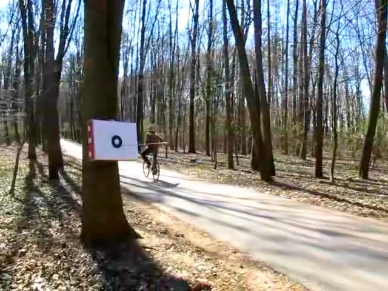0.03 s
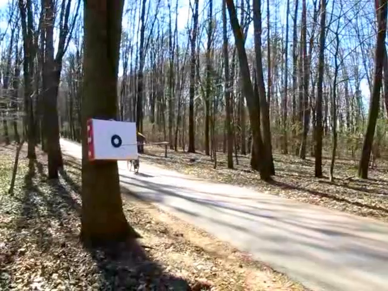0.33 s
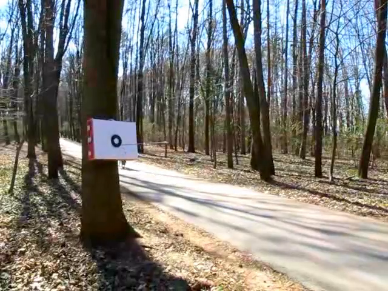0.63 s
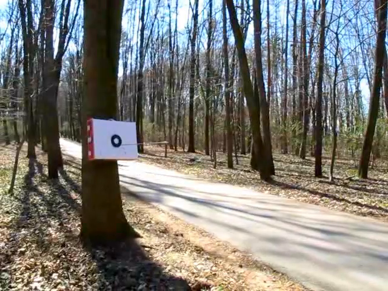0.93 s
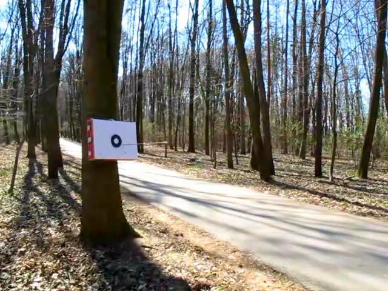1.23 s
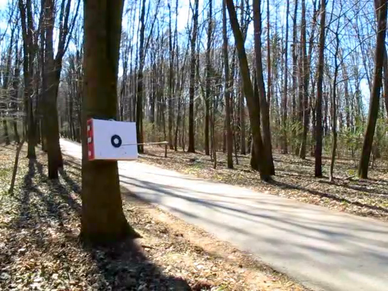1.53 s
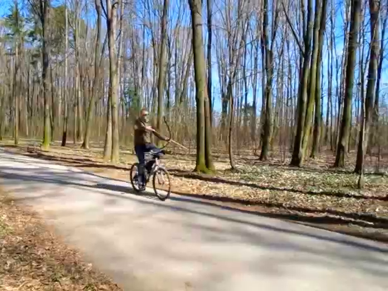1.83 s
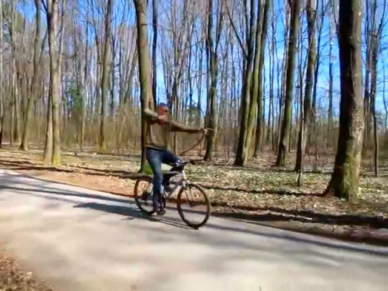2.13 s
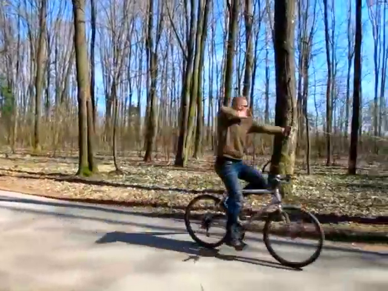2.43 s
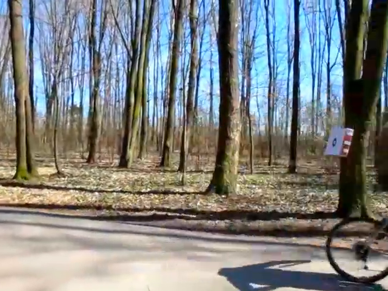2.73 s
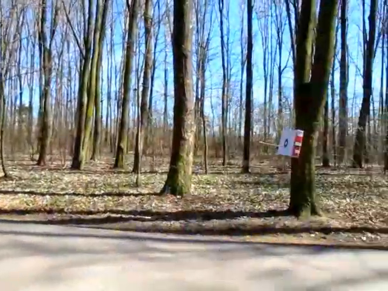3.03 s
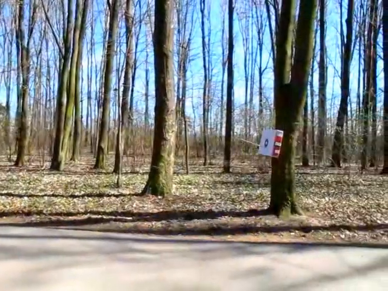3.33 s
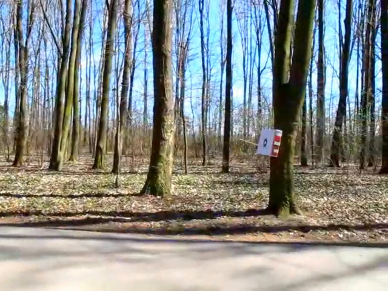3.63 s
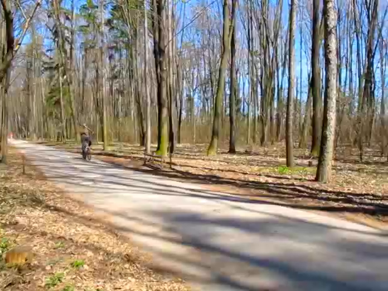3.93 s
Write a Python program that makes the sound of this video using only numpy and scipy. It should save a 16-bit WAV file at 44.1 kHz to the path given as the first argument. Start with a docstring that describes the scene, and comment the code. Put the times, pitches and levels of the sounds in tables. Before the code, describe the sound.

One loud arrow strike on a hollow box follows right after a bowstring's snap on a woodland path. Earlier a faint bicycle bell rings out under gusts on the microphone; tyres pass close, ending with a thin brake squeal.

```python
"""A bicycle bell dies out among trees as tyres roll away and wind buffets the microphone.
The rider is an archer on a woodland path, heard from two places with a short silence between.
At the second the tyres hiss close by over grit, the bowstring swishes and snaps, and the arrow
cracks into a hollow target box, echoing off the trunks. The brake squeals and a tyre scrubs."""
import sys
import numpy as np
from scipy import signal
from scipy.fft import rfft, irfft
from scipy.io import wavfile
from scipy.ndimage import uniform_filter1d, map_coordinates

SR = 44100
rng = np.random.default_rng(int(sys.argv[2]) if len(sys.argv) > 2 else 0)


def transcribe(u):
    """Save the signal u as a 16-bit wav file named by the first command-line argument.

    u: samples, shape (n,) or (channels, n), limited to [-1, 1]; the rate is SR.
    q: integer samples, one column per channel.
    """
    v = np.clip(np.atleast_2d(u).T, -1, 1)
    q = np.round(v * 32767).astype(np.int16)
    wavfile.write(sys.argv[1], SR, q)


N = 176400
T = np.arange(N) / SR
PAUSE_S = (1.603, 1.739)  # silence between the two microphone positions


def amp(db):
    """Decibels to gain."""
    return 10 ** (np.asarray(db) / 20)


def unit(x):
    """Scale to rms 1."""
    return x / np.sqrt(np.mean(x ** 2))


def curve(table, axis=1):
    """One column of a table, joined by straight lines in time."""
    rows = np.array(table)
    return np.interp(T, rows[:, 0], rows[:, axis])


def noise(colour):
    """Noise of a given spectrum, falling steeply beyond its ends."""
    hz, db = np.array(colour, float).T
    f = np.maximum(np.arange(N // 2 + 1) * SR / N, 1)
    ends = np.minimum(f / hz[0], 1) ** 2 * np.minimum(hz[-1] / f, 1) ** 4
    shape = amp(np.interp(np.log(f), np.log(hz), db))
    return unit(irfft(rfft(rng.standard_normal(N)) * ends * shape, N))


def band(hz, width_hz):
    """Noise in one bell-shaped band."""
    f = np.arange(N // 2 + 1) * SR / N
    return unit(irfft(rfft(rng.standard_normal(N)) * np.exp(-2 * ((f - hz) / width_hz) ** 2), N))


def whistle(hz, width_hz):
    """A band of noise around a moving pitch."""
    phase = 2 * np.pi * np.cumsum(hz) / SR
    return band(0, width_hz) * np.cos(phase) + band(0, width_hz) * np.sin(phase)


def fade(start, decay):
    """Sudden start, exponential decay."""
    return (T >= start) * np.exp(-np.maximum(T - start, 0) / decay)


def ring(start, t60):
    """Sudden start, 60 dB down after t60."""
    return fade(start, t60 / np.log(1000))


def hump(middle, half_length):
    """A smooth rise and fall."""
    return np.exp(-.5 * ((T - middle) / half_length) ** 2)


def steady(x, size):
    """Even out the slow swells of a noise."""
    return x / np.sqrt(uniform_filter1d(x ** 2, size) + 1e-9)


def woods():
    """The faint hush of the woods all around."""
    colour = [(500, -0.5), (1100, -5.5), (2700, -20), (10500, -27.5), (15000, -38)]  # spectrum (frequency [Hz], level [dB])
    return amp(-56.5) * noise(colour)


def wind():
    """Rumble and flutter swell on the microphone; sharp gusts break into brighter eddies."""
    # spectra of the wind (frequency [Hz], level [dB])
    rumble_colour = [(12, 4.5), (30, 5.5), (55, -1), (85, -7.5), (130, -19.5), (220, -43), (450, -65.5)]
    flutter_colour = [(80, 0.5), (140, -1), (220, -10), (350, -23), (600, -39), (1200, -53)]
    eddy_colour = [(60, -12), (150, 2), (350, -0.5), (550, -11), (900, -20.5), (1400, -35.5), (2400, -58)]
    breeze = [(0, -16.5, -26.5), (.25, -20.5, -33.5), (.42, -15.5, -25.5), (.92, -20, -26.5),
              (1.1, -17, -20), (1.6, -21.5, -22), (1.74, -24.5, -63), (2.4, -25, -71), (2.68, -36.5, -62),
              (3.25, -30, -59), (3.7, -22, -39)]  # slow drift (time [s], rumble [dB], flutter [dB])
    swells = [(0.398, 0.026, -15, -34), (0.59, 0.038, -13, -29.5), (0.821, 0.029, -11.5, -22),
              (2.108, 0.045, -15.5, -50), (2.317, 0.036, -18.5, -47), (3.4, 0.0082, -19.5, -27),
              (3.55, 0.015, -11, -22)]  # soft buffets (middle [s], half length [s], rumble [dB], flutter [dB])
    gusts = [(0.496, 0.011, -31.5), (0.623, 0.021, -29), (.69, 0.011, -27.5), (1.011, 0.053, -23.5),
             (1.072, 0.026, -19), (1.106, 0.049, -20.5), (1.219, 0.016, -23), (1.256, 0.12, -25),
             (1.393, 0.0327, -23), (1.434, 0.071, -30), (1.503, 0.095, -19), (3.54, 0.012, -33.5)]  # sharp buffets (start [s], length [s], level [dB])
    rumble, flutter = amp(curve(breeze)), amp(curve(breeze, axis=2))
    for s, half_length, rumble_db, flutter_db in swells:
        rumble += amp(rumble_db) * hump(s, half_length)
        flutter += amp(flutter_db) * hump(s, half_length)
    gate = sum(amp(db) * np.clip(np.minimum(T - s, s + length - T) * SR, 0, 1) for s, length, db in gusts)
    eddies = steady(noise(eddy_colour) * amp(3.5 * band(0, 160)), size=1000)
    eddies *= uniform_filter1d(gate, size=200)
    crackle = amp(-40) * hump(1.123, 0.0025) * band(1200, 1200)  # at the peak of a hard gust
    rumble *= steady(noise(rumble_colour), size=3500)
    flutter *= steady(noise(flutter_colour), size=2500)
    return crackle + rumble + flutter + eddies


def clack():
    """A dry wooden clack far off rattles in broad resonances."""
    blows = [(1.336, -8.5), (1.342, -0.5), (1.362, -10)]  # clack and rattle (time [s], gain [dB])
    modes = [(1690, -36.5, 0.017), (2580, -42.5, .04), (3150, -44.5, 0.03)]  # the wood's modes (frequency [Hz], level [dB], t60 [s])
    return sum(band(hz, width_hz=600) * sum(amp(db + blow_db) * ring(s, t60) for s, blow_db in blows)
               for hz, db, t60 in modes)


def ticks():
    """Short dry ticks, each with its own brightness."""
    bursts = [(1.3357, -49, 0.0028, 11000), (1.381, -56, .003, 8000), (1.5878, -36, 0.00055, 8200),
              (2.462, -35, .0032, 12000), (3.283, -41.5, .0015, 7500), (3.468, -39, 0.0085, 9000),
              (3.468, -36, .0054, 2630), (3.678, -38, .0022, 3000)]  # ticks and knocks (time [s], level [dB], decay [s], centre [Hz])
    return sum(amp(db) * fade(s, decay) * band(hz, hz * 0.98) for s, db, decay, hz in bursts)


def path_reflection(x):
    """The path mirrors the sound; the short delay cuts a dip that climbs as the bicycle moves on."""
    dip = [(2.7, 2900), (3.0, 4100), (3.3, 6400)]  # lowest dip (time [s], frequency [Hz])
    strength = amp(-18.5)
    late = T - .5 / curve(dip)
    mirrored = map_coordinates(x, [late * SR], mode="mirror")
    return (x + strength * mirrored) / np.hypot(1, strength)


def tyres():
    """Tread hisses and grit pops on the path: bright on the approach, duller once past."""
    # tread rolling away, then coming near (time [s], level [dB])
    away_level = [(0, -54.5), (.25, -53), (.5, -58), (.8, -65), (1.6, -65)]
    near_level = [(1.74, -40), (1.95, -38.5), (2.15, -38.5), (2.33, -36.5), (2.44, -35.5), (2.5, -45),
                  (2.6, -59), (2.9, -87)]
    past_level = [(2.56, -48, -47), (2.7, -48.5, -48), (3.2, -43, -50), (3.75, -46, -53.5)]  # past the microphone (time [s], middle [dB], treble before trim [dB])
    # spectra of tread and grit (frequency [Hz], level [dB])
    away_colour = [(300, 6.5), (1500, 0), (3300, -2.5), (6000, -9.5), (10000, -15), (15000, -24)]
    near_colour = [(200, -0.5), (400, 1), (1000, -2), (1700, -6), (2800, -5.5), (3800, -1.5), (5300, -8),
                   (10800, -18), (15500, -44)]
    middle_colour = [(100, -2.5), (250, 2), (550, 2.5), (1000, -2), (1600, -0.5), (2700, -4), (4000, -12),
                     (7000, -43)]
    treble_colour = [(2000, -17), (3500, 5), (5500, 4.5), (6800, -3.5), (10000, -7), (12500, -15.5),
                     (15500, -32)]
    grit_colour = [(5000, -8), (10000, -8), (15500, -21)]
    grains_per_s, treble_trim_db, past_from_s = 140, -2.5, 2.45
    away = amp(curve(away_level)) * noise(away_colour)
    grains = (rng.random(N) < grains_per_s / SR) * rng.exponential(size=N)
    grit = amp(-22) * unit(uniform_filter1d(grains, size=60) * noise(grit_colour))
    near = amp(curve(near_level)) * (noise(near_colour) + grit)
    middle = amp(curve(past_level)) * noise(middle_colour)
    treble = amp(treble_trim_db + curve(past_level, axis=2)) * (noise(treble_colour) + grit)
    past = path_reflection(middle + treble) * (T > past_from_s)
    uneven = amp(0.96 * band(0, 120))
    return uneven * np.where(T < PAUSE_S[0], away, near + past)


def bell():
    """The receding bell wavers as its paths beat; echoes from trees ahead come back higher in pitch."""
    modes = [(1588, -58.5, 2.1), (4040, -56.5, 1.6), (7240, -43, 0.45), (7320, -48.5, 0.85),
             (11260, -41.5, 0.36), (11120, -61.5, 0.91)]  # modes heard from behind (frequency [Hz], level [dB], t60 [s])
    echo_shift = 0.035  # fraction of the pitch
    out = 0
    for hz, db, t60 in modes:
        tone = np.sqrt(2) * np.sin(2 * np.pi * (hz * T + rng.random()))
        waver = 1.08 * band(hz, width_hz=60)
        echoes = band(hz * (1 + echo_shift / 2), hz * echo_shift)
        early, late = amp(db - 3) * ring(0, t60=0.36), amp(-61) * ring(0, t60=2)
        out += amp(db) * ring(0, t60) * (tone + waver) + echoes * (early + late)
    return out


def braking():
    """A thin squeal from the brake, then the tyre scrubs on the path."""
    brake = [(3.66, 7600, -82), (3.73, 7740, -60.5), (3.83, 7600, -58.5), (3.91, 7600, -83)]  # squeal (time [s], pitch [Hz], level [dB])
    skid_colour = [(150, -12.5), (500, -3), (950, 5.5), (1500, -6), (3000, -18.5), (6000, -17.5),
                   (10500, -28.5), (14000, -38.5)]  # spectrum of the scrub (frequency [Hz], level [dB])
    skid_s, rise_s = 3.9, 0.02
    squeal = amp(curve(brake, axis=2)) * whistle(curve(brake), width_hz=150) * (T > brake[0][0])
    skid = amp(-36.5) * np.clip((T - skid_s) / rise_s, 0, 1) * noise(skid_colour)
    return squeal + skid


def release():
    """The string speeds up with a rising swish and snaps as the arrow leaves."""
    snaps = [(2.415, -30, .0015), (2.418, -23, 0.0036), (2.4285, -30, .0018)]  # string and shaft passing the bow (time [s], level [dB], decay [s])
    snap_colour = [(500, -4), (2000, 1), (4200, -6), (5800, 4), (9000, 5.5), (11500, 2), (15500, -21)]  # their spectrum (frequency [Hz], level [dB])
    peak_s, rise_s, fall_s = 2.417, 0.0079, 0.0025
    top_hz, climb_hz_per_s = 1894, 44500
    since = T - peak_s
    swell = np.exp(-np.abs(since) / np.where(since < 0, rise_s, fall_s))
    pitch = np.clip(top_hz + climb_hz_per_s * since, top_hz / 2, top_hz)
    swish = amp(-27) * swell * whistle(pitch, width_hz=820)
    return swish + noise(snap_colour) * sum(amp(db) * fade(s, decay) for s, db, decay in snaps)


def strike():
    """The point cracks through the face of the box and the shaft squeaks to a stop in a few jerks."""
    cracks = [(2.4743, -5, 0.0012), (2.4762, -12, 0.0008), (2.4755, -24.5, 0.0088), (2.4864, -16.5, .001)]  # the face cracks, crumbles, knocks back (time [s], level [dB], decay [s])
    crack_colour = [(200, 3.5), (660, 8), (850, 0), (2300, -4.5), (4000, -3.5), (6000, 4.5), (7100, 0),
                    (8800, -0.5), (13000, -4), (15500, -22)]  # its spectrum (frequency [Hz], level [dB])
    bites = [(2.4740, -5.5, 0.00029, 5000), (2.4746, 0, 0.00026, 5160), (2.4764, -2, 0.00022, 5500)]  # shaft squeaks (time [s], level [dB], half length [s], pitch [Hz])
    out = steady(noise(crack_colour), size=100) * sum(amp(db) * fade(s, decay) for s, db, decay in cracks)
    for s, db, half_length, hz in bites:
        phase = 2 * np.pi * hz * (T - s)
        out += amp(db) * hump(s, half_length) * (np.sin(phase) + amp(-18) * np.sin(2 * phase))
    return out


def box():
    """The hollow thud of the target box: each blow rings all its modes."""
    thuds = [(2.4744, 0), (2.4872, -19)]  # the box takes the arrow, then knocks back (time [s], gain [dB])
    modes = [(109, -18, 0.108), (169, -19, 0.078), (381, -22.5, 0.066), (535, -15, 0.023),
             (625, -9.5, 0.031), (1087, -25, .06), (1900, -24.5, 0.04), (3610, -26, .02)]  # its modes (frequency [Hz], level [dB], t60 [s])
    return sum(amp(blow_db + db) * ring(s, t60) * np.sin(2 * np.pi * hz * (T - s))
               for s, blow_db in thuds for hz, db, t60 in modes)


def among_trees(x):
    """Add a thin scatter of echoes from the trunks."""
    scatter = rng.standard_normal(N) * ring(0, t60=0.22)
    return x + amp(-21.5) * signal.fftconvolve(x, scatter / np.linalg.norm(scatter))[:N]


def scene():
    """The shot, the far clack, the bicycle, the wind and the woods at one mono microphone."""
    impacts = among_trees(release() + strike() + box() + clack())
    return (impacts + bell() + tyres() + braking() + ticks() + wind() + woods())[None]


def record(dry):
    """Each stretch fades in and out around the silence; overload on the hit, and a steep top cut."""
    heard = ((T > .003) & (T < PAUSE_S[0])) | ((T > PAUSE_S[1]) & (T < T[-1] - .003))
    fader = uniform_filter1d(1. * heard, size=100)
    top_cut = signal.ellip(8, .2, 70, 15900, fs=SR, output="sos")
    return signal.sosfilt(top_cut, np.clip(dry * fader, -1, 1))


dry = scene()
out = record(dry)
transcribe(out)
```